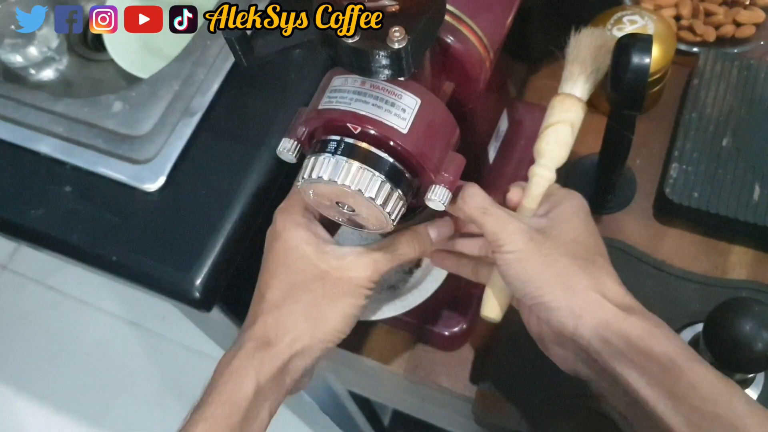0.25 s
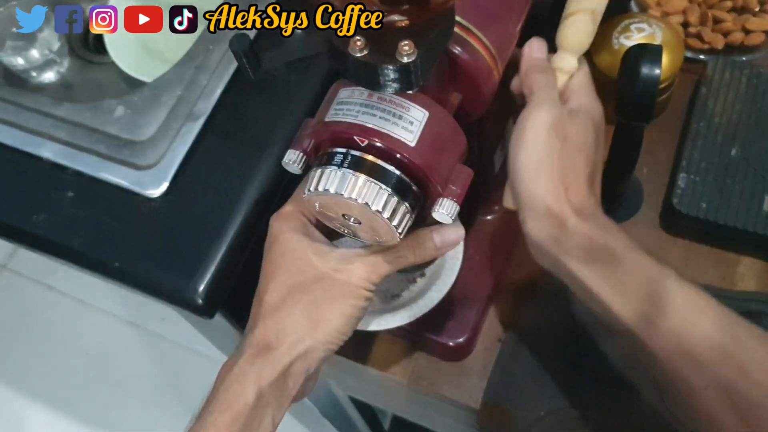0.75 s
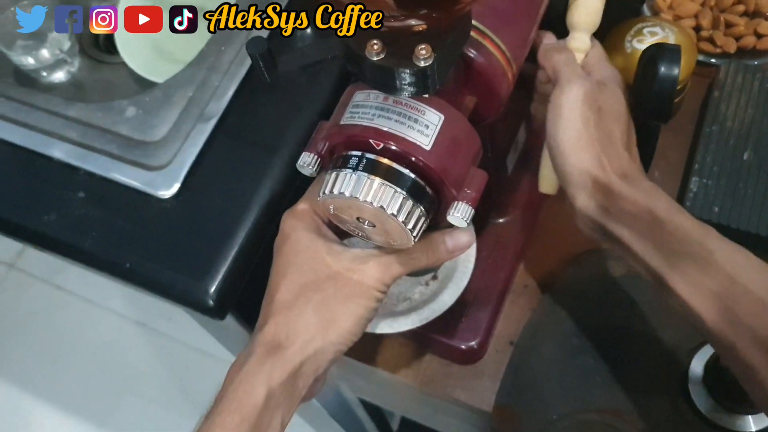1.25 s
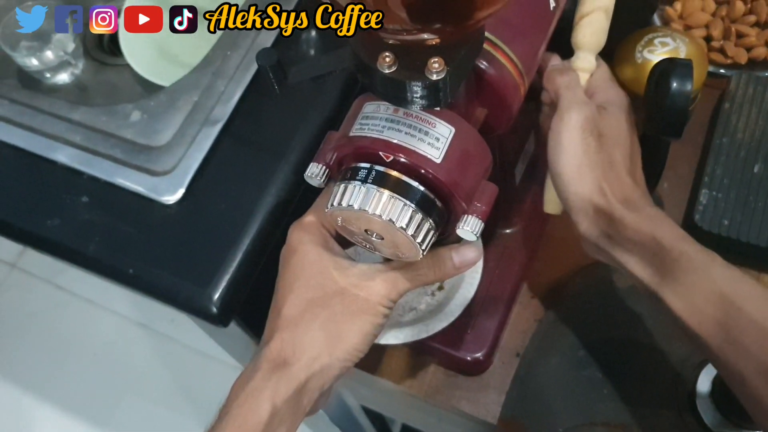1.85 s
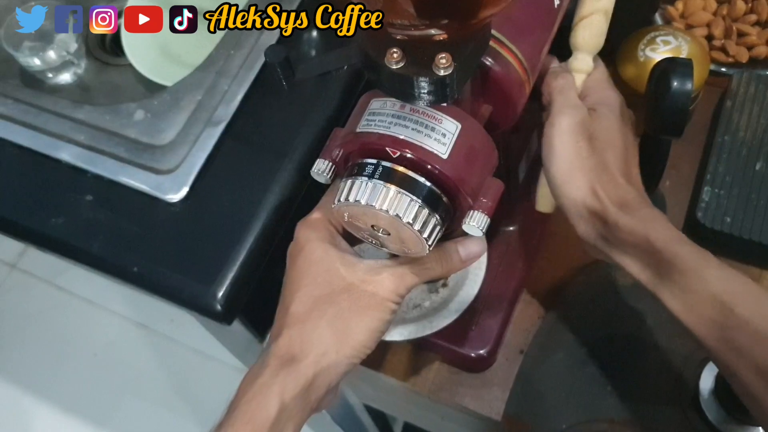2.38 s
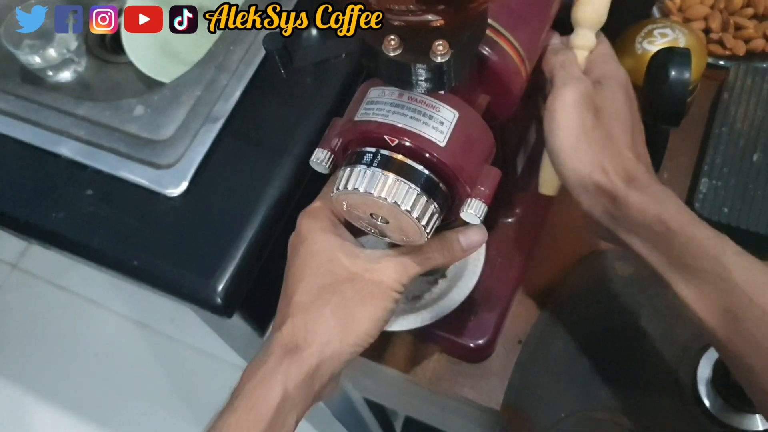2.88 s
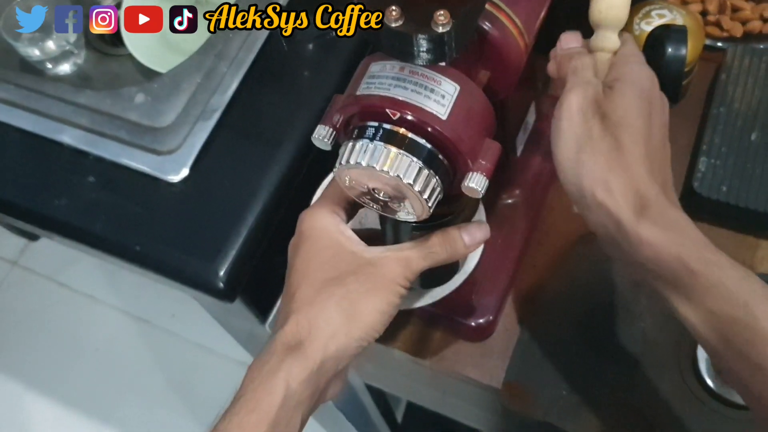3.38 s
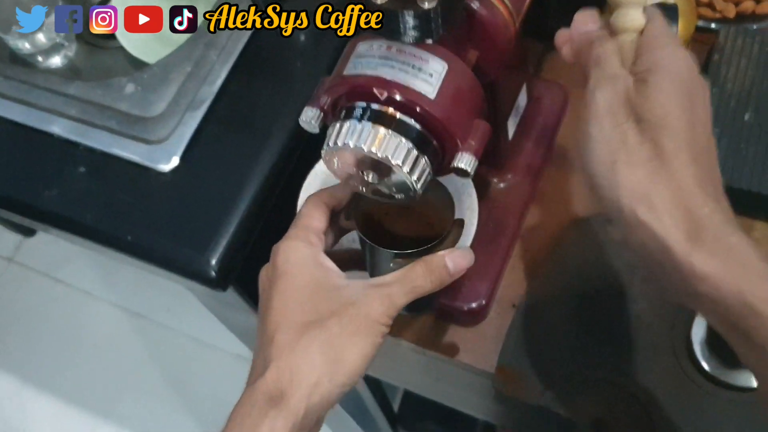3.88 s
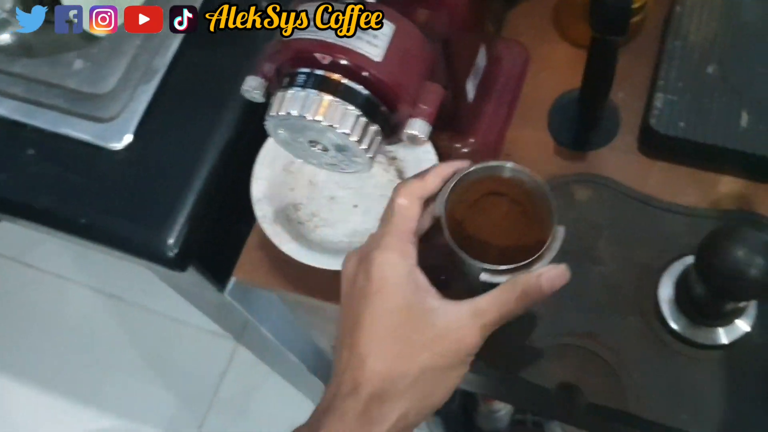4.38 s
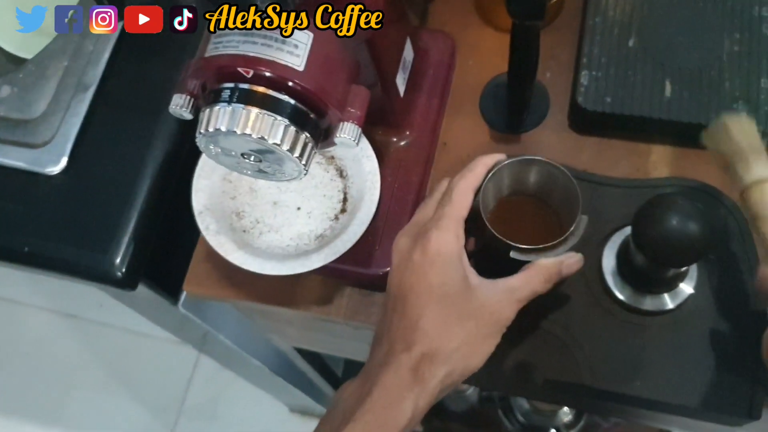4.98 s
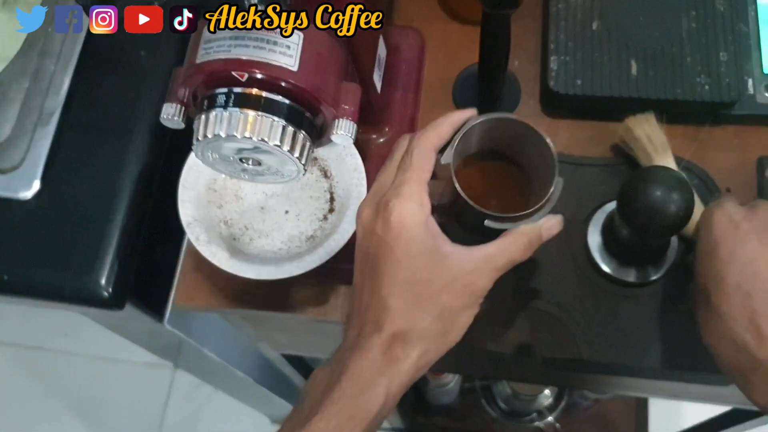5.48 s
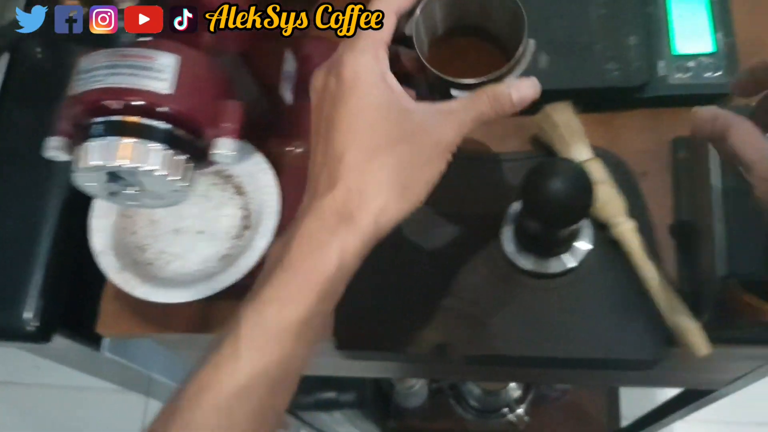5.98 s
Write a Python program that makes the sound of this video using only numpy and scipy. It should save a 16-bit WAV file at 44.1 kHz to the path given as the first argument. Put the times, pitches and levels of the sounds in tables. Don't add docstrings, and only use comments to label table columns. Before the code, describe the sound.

A small electric coffee grinder snaps on, whirs for a second and coasts down, then a steel cup lands twice and a wooden brush clacks down.

```python
import sys
import numpy as np
from scipy import signal
from scipy.fft import rfft, irfft, next_fast_len
from scipy.io import wavfile

SR = 44100
rng = np.random.default_rng(int(sys.argv[2]) if len(sys.argv) > 2 else 0)


def dump_mix(stems):
    frames = np.atleast_2d(stems).T
    limited = np.clip(frames, -1, 1)
    pcm = np.round(limited * 32767).astype(np.int16)
    wavfile.write(sys.argv[1], SR, pcm)


def volts_from_decibels(level):
    exponent = np.asarray(level, float) / 20
    return 10 ** exponent


N = 275163
TIME, FAST = np.arange(N) / SR, next_fast_len(N)
HZ = np.maximum(np.fft.rfftfreq(FAST, 1 / SR), 1)
LEFT_RIGHT = np.array([[1], [-1]])
POWER_ON_S, POWER_OFF_S, STOP_S = 1.368, 2.436, 4.35
FULL_HZ = 552.7
# (frequency [Hz], level [dB], time to fall 60 dB [s])
HANDLING_MODES = [(441.4, 6, 0.04), (655, 0, 0.04), (959, -6.5, 0.03)]


def rms_one(x):
    return x / np.sqrt(np.mean(x ** 2) + 1e-20)


def at_hz(points, hz=HZ):
    point_hz, value = np.transpose(points)
    return np.interp(np.log(hz), np.log(point_hz), value)


def resonance(hz, center_hz, width_hz, power=2):
    return 1 / (1 + (2 * (hz - center_hz) / width_hz) ** power)


def band(x, low_hz, high_hz):
    return signal.sosfilt(signal.butter(3, [low_hz, high_hz], "band", fs=SR, output="sos"), x)


def drift(rate):
    knots = rng.standard_normal(int(N / SR * rate) + 2)
    return np.interp(TIME * rate, np.arange(len(knots)), knots)


def back_in_time(spectrum):
    return irfft(spectrum, FAST)[:, :N]


def stereo_noise():
    # (frequency [Hz], likeness [-1 to 1])
    likeness = [(60, 0.5), (130, 0.87), (290, 0.83), (640, 0.37), (1410, 0.041), (3100, 0.68),
                (6820, -0.13), (15000, -0.48)]
    mid, side = rfft(rng.standard_normal((2, FAST)))
    alike = np.clip(at_hz(likeness), -1, 1)
    return (np.sqrt(1 + alike) * mid + np.sqrt(1 - alike) * side * LEFT_RIGHT) / np.sqrt(2)


def strike(modes, size, contact_s, lag_s):
    t = TIME[:size]
    late = t + lag_s * LEFT_RIGHT / 2
    rings = 0
    for k, (hz, db, t60) in enumerate(modes):
        level = volts_from_decibels(db + rng.normal(0, 1) - 60 * t / t60)
        rings = rings + (-1) ** k * level * np.sin(2 * np.pi * hz * late)
    return rings * np.minimum(t / contact_s, 1)


def blows(events, modes, ring_db, crack_db, crack_s, rise_s, top_hz, pan_db, slope_db, lag_s=0):
    # (low edge [Hz], high edge [Hz], length [factor], width [factor])
    crack_bands = [(152, 514, 4.6, 0.057), (440, 1154, 2, 0.66), (1250, 2818, 1.126, 1.1),
                   (3620, 12670, 1.36, 0.79)]
    out, size = np.zeros((2, N)), SR // 3
    t = TIME[:size]
    for s, peak_db, thud_db, snap_db, octaves in events:
        levels = [thud_db]
        for low_hz, high_hz, *_ in crack_bands[1:]:
            center = np.log2(low_hz * high_hz / 1e6) / 2
            levels.append(snap_db - slope_db * abs(center - octaves))
        blow = volts_from_decibels(peak_db + ring_db) * strike(modes, size, rise_s, lag_s)
        for db, (low_hz, high_hz, longer, width) in zip(levels, crack_bands):
            mid, side = rng.standard_normal((2, size))
            noise = rms_one(band(mid + width * side * LEFT_RIGHT, low_hz, high_hz))
            fade = np.exp(-t / (crack_s * longer)) * np.minimum(t / rise_s, 1)
            blow = blow + volts_from_decibels(db + crack_db) * noise * fade
        at = round((s + .0015) * SR)
        out[:, at:at + size] += blow[:, :N - at]
    limits = signal.butter(1, [45, min(top_hz, 20000)], "band", fs=SR)
    return signal.lfilter(*limits, out) * volts_from_decibels(pan_db / 2 * LEFT_RIGHT)


def room_tone():
    # (frequency [Hz], level [dB per Hz])
    air = [(12, -45.5), (20, -10), (60, -9.5), (135, -0.5), (165, -15.5), (195, 5), (265, -8), (479, -10.5),
           (521, -29), (599, -14.5), (709, -32.5), (1100, -38), (5070, -50), (7950, -51), (13600, -41),
           (16500, -47.5)]
    # (time [s], level [dB])
    air_level = [(0, -64), (1.2, -67), (2.0, -65.5), (3.6, -55), (4.4, -63.5), (5.6, -59.5), (6.24, -66.5)]
    noise = stereo_noise() * volts_from_decibels(at_hz(air))
    low = 1 / (1 + (HZ / 900) ** 4)
    level_db = np.interp(TIME, *np.transpose(air_level)) + 2 * drift(9.1)
    drone = volts_from_decibels(level_db) * rms_one(back_in_time(noise * low)) * volts_from_decibels(-1.2 * LEFT_RIGHT)
    return drone + volts_from_decibels(-79.0) * rms_one(back_in_time(noise * (1 - low)))


def rustling():
    # (time [s], ring [dB], thud [dB], crack [dB], crack pitch [octaves over 1 kHz])
    rubs = [(0.344, -63, -62.5, -57, 2.5), (0.904, -62, -75.5, -58.5, 1.56), (3.898, -53.5, -74, -58, 3),
            (4.139, -62, -61, -63.5, 3.5), (5.475, -61.5, -70, -45, -1.55), (5.618, -58.5, -79.5, -58.5, 3),
            (5.909, -59.5, -72, -58, 2)]
    # (time [s], ring [dB], thud [dB], crack [dB], pitch [octaves
    # over 1 kHz])
    swishes = [(0.427, -80, -64, -45, 0.65), (5.43, -80, -62, -45, 0), (3.9, -80, -75, -61, 0.7)]
    hands = blows(rubs, HANDLING_MODES, ring_db=-42.0, crack_db=-7.0, crack_s=0.038, rise_s=0.017,
                  top_hz=8930, pan_db=-2.5, slope_db=6.5)
    bristles = blows(swishes, HANDLING_MODES, ring_db=-42.0, crack_db=-7.0, crack_s=0.045, rise_s=0.008,
                     top_hz=3000, pan_db=-2.2, slope_db=12)
    return hands + bristles


def handling():
    # (time [s], ring [dB], thud [dB], crack [dB], crack pitch [octaves over 1 kHz])
    bumps = [(0.369, -76.5, -70, -50, 2), (0.373, -41, -52, -61, -1.5), (0.357, -63, -55, -79, -1.5),
             (0.878, -79, -54.5, -63, 0.5), (5.186, -62.5, -53.5, -47.5, -1), (5.312, -79.5, -74, -62.5, 3),
             (5.488, -54.5, -45.5, -51, 0.96), (5.503, -49, -49.5, -48.5, -0.2)]
    return blows(bumps, HANDLING_MODES, ring_db=-10, crack_db=0.5, crack_s=0.0025, rise_s=0.00086,
                 top_hz=12000, pan_db=-3.0, slope_db=4.5)


def knock():
    # (time [s], ring [dB], thud [dB], crack [dB], crack pitch [octaves over 1 kHz])
    hits = [
        (0.429, -37, -55, -42, 0.7),
        (0.443, -52.5, -61.5, -55, 0.24),
        (0.451, -46.5, -67, -55, 0.25),
    ]
    # (frequency [Hz], level [dB], time to fall 60 dB [s])
    wood = [(429.4, 2, 0.043), (657, 2, 0.087), (779.6, 0, 0.04), (1157, -8, 0.014), (1550, -6, 0.014),
            (2080, -4, 0.014), (2700, -10, .01)]
    return blows(hits, wood, ring_db=-9.0, crack_db=2.0, crack_s=0.00243, rise_s=0.0004,
                 top_hz=3200, pan_db=-2.0, slope_db=8)


def boom():
    # (time [s], level [dB], frequency [Hz], time to fall 60 dB [s])
    thumps = [
        (0.88, -50.5, 190, .12),
        (1.368, -41, 92, .4),
        (1.37, -52, 55, .3),
        (4.748, -43, 92, .3),
        (4.935, -42, 92, .3),
        (5.485, -46.5, 199.6, 0.602),
    ]
    out = np.zeros(N)
    for s, db, hz, t60 in thumps:
        t = np.maximum(TIME - s, 0)
        out += volts_from_decibels(db - 60 * t / t60) * np.sin(2 * np.pi * hz * t)
    return out


def press():
    # (time [s], ring [dB], thud [dB], crack [dB], crack pitch [octaves over 1 kHz])
    clicks = [
        (1.243, -32, -66, -36, 1.7),
        (1.356, -44, -80, -60, 1),
    ]
    # (frequency [Hz], level [dB], time to fall 60 dB [s])
    rocker = [(950, -12, .012), (2050, 4, .025), (2350, -3, .03), (2870, 0, .02), (3980, 0, .025),
              (4250, -5, .03), (6300, -14, .008)]
    return blows(clicks, rocker, ring_db=-17.5, crack_db=7.5, crack_s=0.00144, rise_s=0.0015,
                 top_hz=13385, pan_db=-3.0, slope_db=10.5, lag_s=.00006)


def switch():
    # (time [s], ring [dB], thud [dB], crack [dB], crack pitch [octaves over 1 kHz])
    snaps = [
        (1.365, -10.5, -35.5, -5, 1.692),
        (2.432, -6, -45.5, -4.5, 1.817),
    ]
    # (frequency [Hz], level [dB], time to fall 60 dB [s])
    shell = [(524, -4, 0.05), (972.7, -2.5, 0.03), (2032, 0.5, 0.03), (2197, -2.5, 0.035),
             (2720, -5, 0.017), (3360, 2, 0.013), (3950, 5.5, 0.012), (4416, 4, 0.012), (5280, 1, 0.02)]
    return blows(snaps, shell, ring_db=-12.5, crack_db=8.5, crack_s=0.001198, rise_s=0.0012,
                 top_hz=13400, pan_db=-3.0, slope_db=11.5, lag_s=.00008)


def slot_rate():
    pull_s, settle_hz, settle_s = .052, 27, .2
    drag_s, friction_hz = 2.25, 470
    on, off = np.maximum(TIME - POWER_ON_S, 0), np.maximum(TIME - POWER_OFF_S, 0)
    settling = settle_hz * np.exp(-on / settle_s)
    pulling = (FULL_HZ - settle_hz) * np.exp(-on / pull_s)
    powered = FULL_HZ - settling - pulling
    return np.maximum((powered + friction_hz) * np.exp(-off / drag_s) - friction_hz, 1)


def slot_whine(slot_hz, turns, driven):
    # (multiple of rotor speed, driven level [dB over noise], coasting level [dB over noise])
    tones = [(1, -8, -30), (4, -28, -30), (6, -25, -30), (8, -32, -28), (10, -21, -24), (12, -13, -10),
             (13, -24, -22), (16, -30, -22), (20, -19, -30), (24, -19, -12), (36, -11, -26), (48, -16, -7),
             (60, -15, -30), (72, -2, -6), (84, -15, -24), (96, -14, -6), (108, -19, -26), (120, -19, -24),
             (132, -19, -30), (141, -14, -30), (144, -22, -16), (156, -20, -22), (168, -22, -10),
             (192, -18, -16), (216, -10, -24), (240, -13, -17), (252, -19, -30), (264, -19, -20),
             (288, -21, -20), (312, -12, -22), (336, -15, -30)]
    # (frequency [Hz], width [Hz], rise [dB])
    panels = [(180, 55, 13), (245, 35, -11), (290, 25, 5), (340, 35, 8), (385, 25, -6), (430, 35, 6),
              (560, 70, -5), (640, 50, 5), (720, 60, -7), (800, 50, 6), (860, 40, -5), (930, 50, 5),
              (1080, 120, -7), (1330, 200, -8), (1720, 160, -5), (2080, 350, 2), (2600, 350, -7),
              (4500, 400, -8), (5300, 600, 5), (6000, 600, -14)]
    # (frequency [Hz], level [dB])
    radiation = [(130, -4), (190, 6), (290, 9), (400, 1), (850, -2), (1200, -11), (1550, -2), (2000, 6),
                 (2700, -7), (3400, -1), (5500, 3), (9000, 0)]
    whine_db, coasting_wobble_db, driven_wobble_db = -3, 2.0, 2.5
    blur_db = 3
    run = slice(round(1.36 * SR), round(STOP_S * SR))
    power = driven[run]
    wobble_db = coasting_wobble_db + (driven_wobble_db - coasting_wobble_db) * power
    whine = np.zeros((2, N))
    for order, driven_db, coasting_db in tones:
        level_db = whine_db + coasting_db + (driven_db - coasting_db) * power
        level_db = level_db + wobble_db * drift(22.057)[run]
        tone_hz = order * slot_hz[run] / 12 + 1
        panels_db = sum(db * resonance(tone_hz[::64], hz, width) for hz, width, db in panels)
        level_db = level_db + np.repeat(panels_db, 64)[:len(tone_hz)]
        level_db = level_db + blur_db * order / 100 * np.log2(slot_hz[run] / FULL_HZ)
        gain = volts_from_decibels(level_db + at_hz(radiation, tone_hz))
        apart = rng.normal(0, min(order / 150, .8), (2, 1))
        whine[:, run] += np.sqrt(2) * gain * np.sin(2 * np.pi * order * turns[run] + apart)
    return whine


def loudness(slot_hz, driven, full_db, per_halving_db, current_db, surge_db, surge_s):
    surge = surge_db * np.exp(-np.maximum(TIME - POWER_ON_S, 0) / surge_s)
    return volts_from_decibels(full_db + per_halving_db * np.log2(slot_hz / FULL_HZ) + driven * (current_db + surge))


def motor():
    # (frequency [Hz], level [dB per Hz])
    housing = [(24, -47), (40, -22.5), (427, -4), (933, -13.5), (1030, -13), (1840, -19), (2200, -12),
               (3050, -26.5), (3730, -26.5), (6330, -13.5), (7370, -23), (8790, -14), (14200, -21),
               (15300, -28.5), (16500, -47)]
    # (frequency [Hz], width [Hz], rise [dB], negative for a
    casting = [(196.8, 6, 5), (150, 60, -6), (446, 170, 3), (634.1, 160, 7), (905, 56, 7), (1982, 340, 0.5),
               (3783, 570, 5), (5450, 610, 4), (6450, 320, 2), (8670, 260, -1), (10350, 970, 3.5),
               (3100, 540, -12.5), (4693, 620, -10), (1300.8, 1300, -2), (2340, 900, 4)]
    # (frequency [Hz], left minus right [dB])
    lean = [(60, -2.5), (130, 0), (290, -2.5), (640, -4.5), (1410, 1), (3100, -5), (6820, -2),
            (15000, -8.5)]
    # (frequency [Hz], width [Hz], share [dB])
    chute_bands = [(2306, 700, -0.5), (6000, 1300, -4)]
    slot_hz = slot_rate()
    rotor_hz = slot_hz / 12
    turns = np.cumsum(rotor_hz) / SR + .0006 * drift(45)
    driven = np.clip((POWER_OFF_S - TIME) / 0.0017, 0, 1)
    settled = volts_from_decibels(-17 * np.clip((1.72 - TIME) / 0.59, 0, 1)) * np.clip(rotor_hz / 6 - 1.2, 0, 1)
    whine = settled * slot_whine(slot_hz, turns, driven)
    beat = 1 + 0.12 * np.sin(2 * np.pi * turns) + 0.083 * driven * np.sin(2 * np.pi * 74.0 * TIME)
    brushes = back_in_time(stereo_noise()) * beat * volts_from_decibels(1.4 * drift(30))
    body_db = at_hz(housing) + sum(db * resonance(HZ, hz, width) for hz, width, db in casting)
    body = rfft(brushes + whine, FAST) * volts_from_decibels(body_db + at_hz(lean) * LEFT_RIGHT / 2)

    low, top = 1 / (1 + (HZ / 820) ** 8), 1 / (1 + (8100 / HZ) ** 6)
    chute = sum(min(volts_from_decibels(db), 1) * resonance(HZ, hz, width, 4) for hz, width, db in chute_bands)
    chute = (1 - low - top) * chute
    middle = 1 - low - top - chute
    rumble, hiss, sing, sizzle = (rms_one(back_in_time(body * part)) for part in (low, middle, chute, top))
    rumble = rumble * loudness(slot_hz, driven, full_db=-42.5, per_halving_db=9, current_db=3.5,
                               surge_db=31.5, surge_s=0.0548)
    hiss = hiss * loudness(slot_hz, driven, full_db=-44.5, per_halving_db=10.7, current_db=-1.5,
                           surge_db=12, surge_s=0.1322)
    sing = sing * loudness(slot_hz, driven, full_db=-47.5, per_halving_db=7, current_db=-0.5,
                           surge_db=9.5, surge_s=0.0726)
    sizzle = sizzle * loudness(slot_hz, driven, full_db=-45, per_halving_db=12.5, current_db=-0.5,
                               surge_db=5, surge_s=0.0053)
    running = np.clip((TIME - POWER_ON_S) / 0.0048, 0, 1) * (TIME < STOP_S)
    return running * (rumble + hiss + sing + sizzle)


def hum():
    # (frequency [Hz], level [dB rms])
    tones = [(99.9, -57.5), (199.8, -40.5), (299.7, -49.5), (399.6, -58), (467.0, -52), (516.0, -51),
             (598.5, -49), (651.4, -47), (700.0, -59)]
    swell = np.clip((TIME - POWER_ON_S) / 0.17, 0, 1) * volts_from_decibels(-80 * np.maximum(TIME - POWER_OFF_S, 0))
    lines = np.zeros(N)
    for hz, db in tones:
        lines += volts_from_decibels(db + 0.84 * drift(9.9)) * np.sin(2 * np.pi * hz * TIME + rng.uniform(0, 6))
    return np.sqrt(2) * swell * lines * volts_from_decibels(-1.2 * LEFT_RIGHT)


def shudder():
    # (time [s], peak level [dB])
    rattles = [(1.41, -32.5), (1.439, -42.5), (1.471, -37.5), (1.542, -35), (1.586, -35), (1.644, -35)]
    # (frequency [Hz], level [dB], time to fall 60 dB [s])
    loose_parts = [(442.27, 9.5, 0.21), (594.8, 9, 0.1), (510, -16, 0.036), (2010, -5, 0.025)]
    out, size = np.zeros((2, N)), SR // 8
    for s, peak_db in rattles:
        out[:, round(s * SR):][:, :size] += volts_from_decibels(peak_db - 6.5) * strike(loose_parts, size, .0005, 0)
    return out


def approach():
    start_s, end_s, end_db, swell_db_per_s = *(5, 4.5, -64.5, 25),
    scrape = rms_one(band(rng.standard_normal((2, N)), 400, 1250))
    level_db = end_db + swell_db_per_s * np.minimum(TIME - end_s, 0) + 3.4 * drift(34)
    return scrape * volts_from_decibels(level_db) * (TIME > start_s) * (TIME < end_s)


def squeaks():
    # (time [s], level [dB], start [Hz], fall [Hz], length [s])
    whistles = [(4.595, -82, 8000, 600, .03), (4.685, -82, 6250, -200, .05), (4.705, -76, 12800, 300, .04),
                (4.96, -70, 12900, 1500, .085)]
    out = np.zeros(N)
    for s, db, hz, fall_hz, length in whistles:
        part = np.clip((TIME - s) / length, 0, 1)
        cycles = np.cumsum(hz - fall_hz * part ** 2) / SR
        out += volts_from_decibels(db) * np.sin(np.pi * part) * np.sin(2 * np.pi * cycles)
    return out


def cup():
    # (time [s], ring [dB], thud [dB], crack [dB], crack pitch [octaves over 1 kHz])
    first_hits = [
        (4.7445, -34, -36, -36, .6),
        (4.7463, -1.5, -34, -24.5, .9),
    ]
    # (frequency [Hz], level [dB], time to fall 60 dB [s])
    first_modes = [(262, 4, 0.07), (151, -8, 0.22), (428, 6, 0.05), (198, -6, 0.3), (345, 2, .035),
                   (515, -14, .2), (365, -10, .3), (781, -14, 0.1), (598, -11, .12), (1110, -11, .05),
                   (684, -10, .04), (1900, -9, .03), (5500, -35, .18), (5590, -33, 0.08)]
    # (time [s], ring [dB], thud [dB], crack [dB], crack pitch [octaves over 1 kHz])
    second_hits = [
        (4.9315, -36, -38, -36, .4),
        (4.9335, -5, -36, -31, 0.42),
    ]
    # (frequency [Hz], level [dB], time to fall 60 dB [s])
    second_modes = [(245, 5, 0.05), (151, -9, 0.3), (428, 4, 0.05), (199, -6, 0.3), (320, 2, .035),
                    (540, -14, .25), (360, -12, .3), (775, -12, .05), (608, -8, .08), (1160, -18, .04),
                    (1500, -20, .06), (2500, -26, .04), (5500, -44, .2)]
    first = blows(first_hits, first_modes, ring_db=-12.5, crack_db=7.5, crack_s=0.00484, rise_s=0.0007,
                  top_hz=6500, pan_db=-2.5, slope_db=6.0, lag_s=0.0000018)
    second = blows(second_hits, second_modes, ring_db=-12.5, crack_db=7, crack_s=0.00447, rise_s=0.0007,
                   top_hz=6500, pan_db=-2.0, slope_db=8.5, lag_s=-0.000037)
    return first + second


def tick():
    # (time [s], ring [dB], thud [dB], crack [dB], crack pitch [octaves over 1 kHz])
    taps = [(5.29, -31, -61, -55, 0.61)]
    # (frequency [Hz], level [dB], time to fall 60 dB [s])
    tap_modes = [(1126, -8, 0.0106), (1634, 2, 0.0121), (2298, -6.5, 0.0083), (3300, -11.5, 0.0094),
                 (5220, -22, 0.013)]
    return blows(taps, tap_modes, ring_db=-6, crack_db=11.0, crack_s=0.0018, rise_s=0.000184,
                 top_hz=5860, pan_db=-4.5, slope_db=10.0)


def brush():
    # (time [s], ring [dB], thud [dB], crack [dB], crack pitch [octaves over 1 kHz])
    clacks = [(5.421, -26.5, -47, -38.5, 0)]
    # (frequency [Hz], level [dB], time to fall 60 dB [s])
    handle = [(450, -3, .03), (700, 1, .04), (1000, 1, .03), (1350, -8, .03), (1830, -11, .12),
              (1920, -14, .1), (2740, -14, .14), (2890, -16, .1), (3080, -20, .06), (4845, -22, .05),
              (6000, -24, .02)]
    return blows(clacks, handle, ring_db=-13.5, crack_db=3.5, crack_s=0.00286, rise_s=0.00041,
                 top_hz=11900, pan_db=-2.5, slope_db=6)


def gust():
    middle_s, level_db, length_s = *(6.08, -63.5, 0.112),
    puff = rms_one(band(rng.standard_normal(N), 35, 120))
    return volts_from_decibels(level_db) * puff * np.exp(-((TIME - middle_s) / length_s) ** 2) * volts_from_decibels(2.5 * LEFT_RIGHT)


def kitchen(x):
    # (frequency [Hz], time to fall 60 dB [s])
    echo_times = [(85, 0.71), (170, 0.61), (340, 0.6), (680, 0.65), (1350, 0.822), (2700, 0.6),
                  (5400, 0.74), (11000, 0.45)]
    size, echo = 3 * SR // 4, 0
    t = TIME[:size]
    for low_hz in 60 * 2.0 ** np.arange(8):
        alike = np.clip(1.05 - low_hz / 1500, 0, .97)
        mid, side = band(rng.standard_normal((2, size)), low_hz, 2 * low_hz)
        pair = np.sqrt(1 + alike) * mid + np.sqrt(1 - alike) * side * LEFT_RIGHT
        echo = echo + pair * volts_from_decibels(-60 * t / at_hz(echo_times, low_hz * np.sqrt(2)))
    echo = echo * np.minimum(t / 0.0032, 1)
    echo = echo / np.sqrt(np.sum(echo ** 2) / 2)
    return signal.fftconvolve(x, echo, axes=1)[:, :N]


def scene():
    rustles, bumps, knocks = rustling(), handling(), knock()
    pressing, snaps = press(), switch()
    grinder = motor() + hum() + shudder()
    cup_hits, ticks, brush_hit = cup(), tick(), brush()
    small = volts_from_decibels(-6.5) * (bumps + rustles) + volts_from_decibels(-5.5) * knocks + volts_from_decibels(-3.0) * brush_hit
    small = small + volts_from_decibels(-8) * ticks + volts_from_decibels(-0.5) * pressing
    echoes = kitchen(volts_from_decibels(-9.0) * grinder + volts_from_decibels(-4.0) * snaps + volts_from_decibels(-5.5) * cup_hits + small)
    near = grinder + pressing + snaps + cup_hits + bumps + knocks + brush_hit + ticks + rustles
    near = near + boom() + approach()
    return near + echoes + room_tone() + gust() + squeaks()


def roll_off(x):
    return signal.sosfilt(signal.butter(12, 16800, fs=SR, output="sos"), x)


def record(dry):
    mix = signal.sosfilt(signal.butter(2, 45, "high", fs=SR, output="sos"), dry)
    mix = signal.sosfilt(signal.cheby2(12, 60, 17200, fs=SR, output="sos"), mix)
    return roll_off(mix)


dry = scene()
out = record(dry)
dump_mix(out)
```